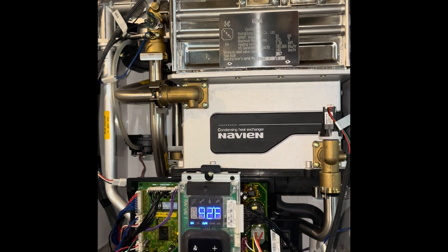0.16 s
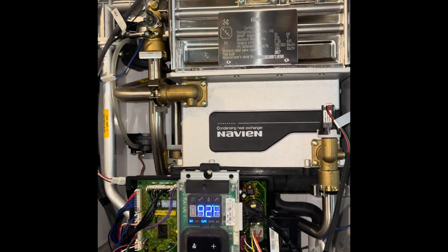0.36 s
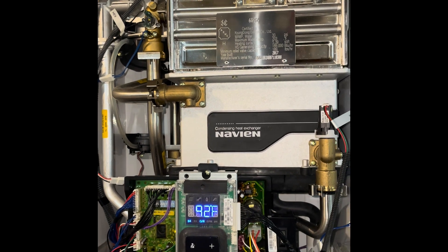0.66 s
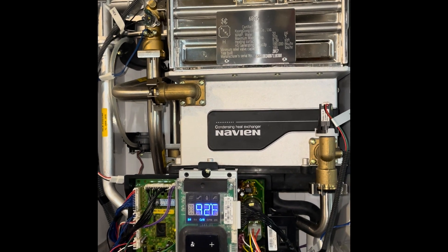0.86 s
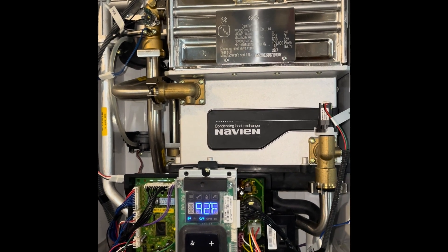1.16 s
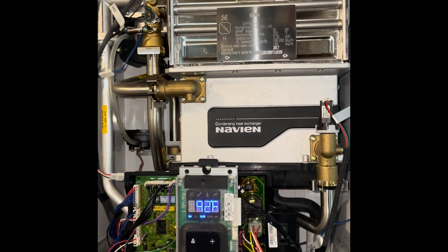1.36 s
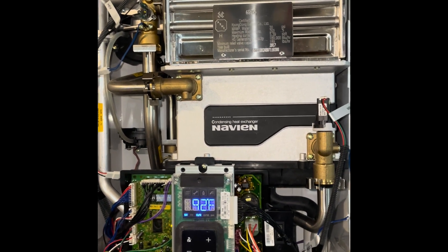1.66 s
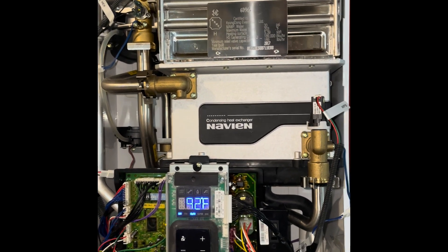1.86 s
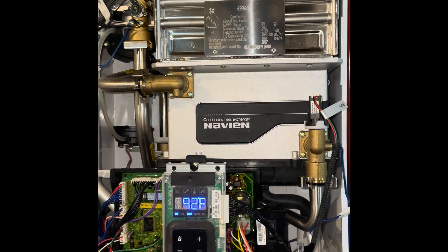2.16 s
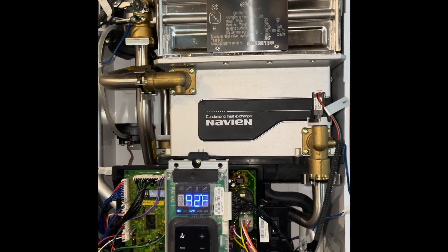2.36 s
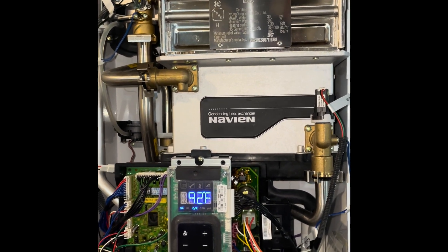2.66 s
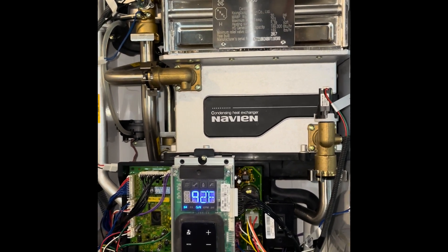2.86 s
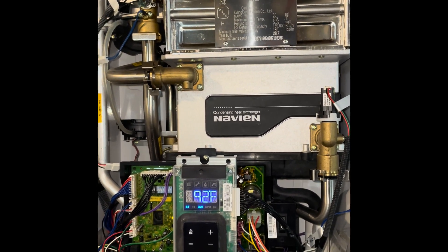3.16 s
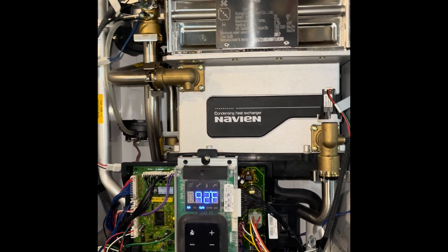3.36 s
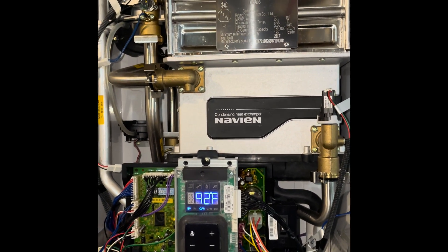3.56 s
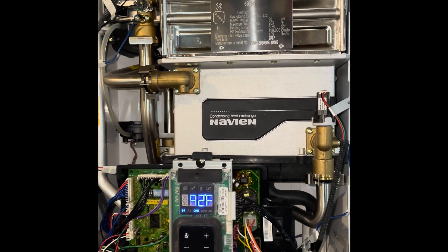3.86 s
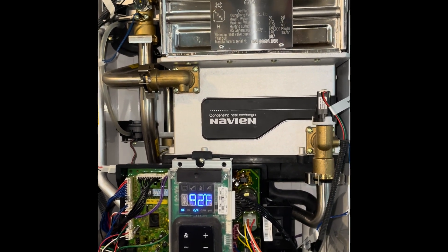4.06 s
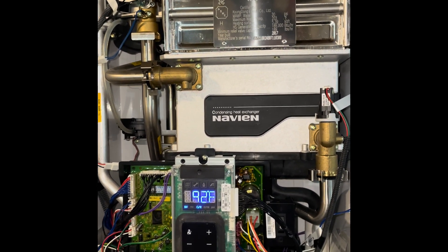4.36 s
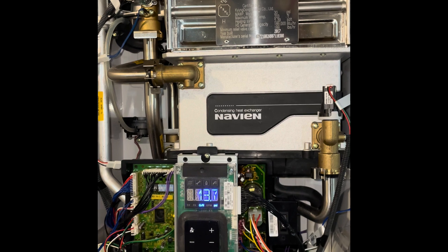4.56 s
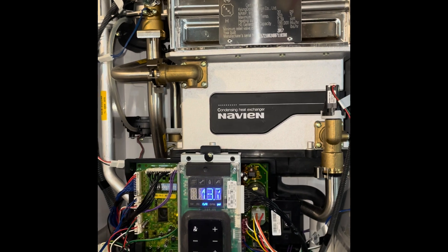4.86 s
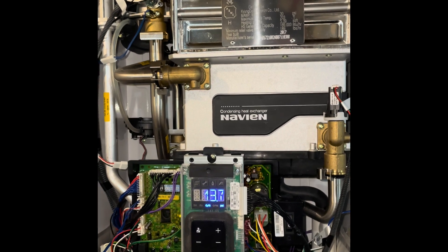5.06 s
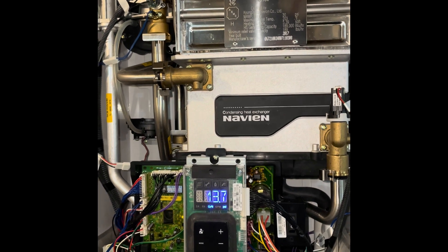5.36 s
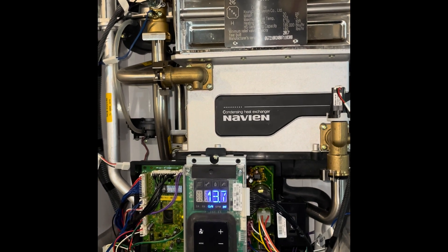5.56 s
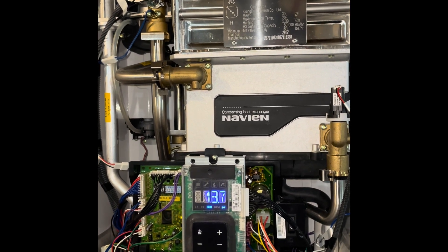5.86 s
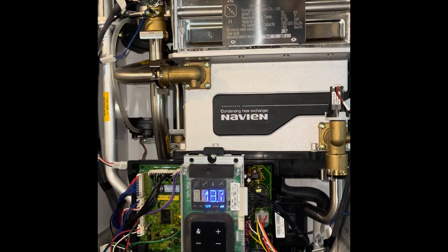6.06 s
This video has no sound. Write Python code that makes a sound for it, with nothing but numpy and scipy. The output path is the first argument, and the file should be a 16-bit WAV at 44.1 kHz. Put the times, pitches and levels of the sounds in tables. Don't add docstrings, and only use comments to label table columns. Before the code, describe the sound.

From 0 s a boiler blower is already at full speed, close to a stereo phone indoors. A hollow low boom around 200 Hz dominates, wavering in short gusts and lulls, including a marked dip near 2.15 s, beneath a broad duct and panel rush. A shaft hum near 97 Hz and a steady whine near 1.26 kHz with a flickering octave cut through, plus faint higher motor lines. A very thin whistling hiss around 11.5 kHz chirps irregularly, holding at about 0.9-1.2 s and more softly at 3.9-4.3 s. Speed barely drifts until 5.8 s, when power drops: blade tones weaken and slide downward, motor whine briefly strengthens then fades, and the roar begins easing. A small relay tick comes at 5.9 s, followed by bright metallic valve clicks at 5.92 and 5.98 s. The sound ends while still coasting.

```python
import sys
import numpy as np
from scipy import signal
from scipy.fft import rfft, irfft, next_fast_len
from scipy.io import wavfile
from scipy.ndimage import uniform_filter1d

SR = 44100
rng = np.random.default_rng(int(sys.argv[2]) if len(sys.argv) > 2 else 0)


def volts_from_db(level):
    exponent = np.asarray(level, float) / 20
    return 10 ** exponent


def dump(signal):
    limited = np.clip(np.atleast_2d(signal).T, -1, 1)
    pcm = np.round(limited * 32767).astype(np.int16)
    wavfile.write(sys.argv[1], SR, pcm)


N = 273861
TIME = np.arange(N) / SR
SIZE = next_fast_len(N)
HZ = np.arange(SIZE // 2 + 1) * SR / SIZE + 1e-3

# time_s, blade_rate_hz
BLADE_RATE = [(0.15, 1256.0), (0.5, 1258.1), (0.9, 1261.7), (1.4, 1261.2), (2, 1261.2), (2.5, 1259.8),
              (3, 1257.5), (3.4, 1257.4), (3.8, 1257.1), (4.3, 1257.2), (4.8, 1258.8), (5.3, 1258.9),
              (5.65, 1259.0)]
BLADES = 13
POWER_OFF_S, COAST_PER_S = 5.82, .335

WHEEL_ORDERS = [
    1,
    13,
    26,
]
# level_db, left_minus_right_db, flicker_db
WHEEL_LINES = [(-47, -.2, 1.2), (-48, -4, .7), (-51.5, .5, 3.4)]
MOTOR_ORDERS = [32, 39, 40, 48, 55, 56, 57, 64, 80]
# level_db, left_minus_right_db, flicker_db
MOTOR_LINES = [(-67, -3, 2.5), (-68, 0, 2.5), (-59.5, 1.5, 2.2), (-73, 0, 2.5), (-69.5, 0, 3.5),
               (-66, 0, 3.5), (-72, 0, 3.5), (-71, 0, 2.5), (-68, 0, 3.5)]
MOTOR_HOLD_S, MOTOR_FADE_S = .1, .1

# freq_hz, left_lead_rad, left_minus_right_db, common_share (0-1)
PORTS = [(60, 0, -.1, .9995), (250, -.07, -1.1, .999), (600, -.1, -1.6, .96), (950, 0, -1.5, .93),
         (1700, .03, -.3, .98), (2300, .62, .8, .94), (3000, .4, -1.5, .73), (4300, .95, -1, .76),
         (5100, .05, 0, .91), (6400, 1.97, 0, .94), (7600, 3.14, 0, .92), (9200, 4.5, 0, .76),
         (10900, 6.28, 0, .82), (15700, 10.7, 0, .72)]

# freq_hz, density_db_per_hz
AIR = [(25, -101), (42, -71), (55, -66), (130, -66), (350, -73), (620, -80), (1400, -82.5), (2100, -77.5),
       (3600, -85.5), (5200, -91), (8200, -91), (10500, -90.5), (12200, -97), (15700, -101)]
# freq_hz, width_hz, density_db_per_hz
DUCTS = [(56, 12, -65.0), (176, 14, -53.0), (209, 28, -45.0), (237, 24, -53.5), (297, 42, -57.0),
         (415, 36, -60.5), (485, 31, -57.0), (548, 38, -61.5), (631, 30, -71.0), (793, 96, -66.0),
         (960, 116, -71.5), (1048, 59, -65.0), (1079, 22, -65.5), (1246, 402, -74.0), (1449, 41, -68.5),
         (1612, 86, -74.5), (1802, 121, -63.5), (1951, 55, -77.5), (2485, 75, -65.0), (2616, 36, -72.5),
         (2788, 67, -72.0), (3270, 197, -79.5), (3837, 166, -86.5), (4382, 62, -84.5), (4890, 90, -80.0),
         (5971, 851, -83.5), (6477, 86, -79.0), (6747, 170, -80.5), (7246, 73, -84.5), (7649, 498, -87.5)]
# freq_hz, width_hz, depth_db
GAPS = [(394, 12, -2.0), (618, 16, -5.0), (703, 14, -3.5), (954, 11, -4.5), (1142, 41, -4.5),
        (1395, 13, -7.5), (1887, 65, -6.0), (2055, 68, -6.5), (2572, 39, -4.5), (3549, 88, -3.0),
        (6324, 76, -2.5), (7505, 24, -7.0), (12893, 142, -10.0)]
RIPPLE_DB, RIPPLE_HZ = 1.3, 35
ROAR_POWER = 2.5
BOOM_TOP_HZ, BOOM_DB, BOOM_DEPTH = 265, -29.5, 1.09
# center_s, change_db, length_s
GUSTS = [(0.01, -2.5, 0.033), (0.162, 6, 0.044), (0.385, 4.0, 0.15), (0.53, -2.5, 0.05), (1.45, 4.5, 0.05),
         (1.55, -2.5, 0.076), (1.7, 4.0, 0.1), (1.8, -3, 0.054), (1.91, 2.5, 0.07), (2.05, 3, 0.05),
         (2.153, -8.0, 0.094), (2.58, -4.5, 0.045), (2.688, 4.5, 0.07), (2.787, -3.5, 0.078),
         (2.92, 5, 0.05), (3.02, -5, 0.11), (3.277, 4.0, 0.13), (3.518, -3.0, 0.044), (3.675, 3.0, 0.14),
         (4.15, -4.0, 0.05), (4.484, 2.5, 0.14), (5.24, 3.5, 0.05), (5.41, -3.5, 0.1), (5.58, 5, 0.058),
         (5.92, 2.5, 0.05), (6.03, -0.5, 0.07)]

JET_HZ, JET_WIDTH_HZ, JET_REST_DB = 11560, 240, -65
JET_POWER = 6.0
# center_s, rise_db
CHIRPS = [(0.08, 3), (0.26, 5), (0.56, 6), (1.43, 4), (1.83, 5), (2.29, 6), (2.56, 4), (2.82, 6),
          (3.259, 6), (3.36, 7), (3.58, 4), (4.35, 7), (4.55, 4), (5.24, 6), (5.35, 5), (5.81, 6)]
CHIRP_S = .05
# start_s, length_s, rise_db
WHISTLES = [
    (0.88, .35, 7.5),
    (3.89, .42, 5.5),
]
WHISTLE_EDGE_S = .03

# start_s, peak_db
TICK = [
    (5.8964, -34),
]
# freq_hz, width_hz, level_db
RELAY_BODY = [(2900, 1500, 0)]
# start_s, peak_db
CLICKS = [
    (5.9189, -35.5),
    (5.9808, -36),
]
# freq_hz, width_hz, level_db
VALVE_BODY = [(5200, 900, -6), (7560, 1200, 3), (9600, 2500, -4), (13000, 3000, -15)]
RELAY_T60_S, VALVE_T60_S = .025, .076

LOW_CUT_HZ = 35


def curve(table):
    return np.interp(TIME, *np.transpose(table))


def speed():
    driven_hz = curve(BLADE_RATE) / BLADES
    coast_s = np.maximum(TIME - POWER_OFF_S, 0)
    return driven_hz * (1 - COAST_PER_S * coast_s)


def port(hz, column):
    table = np.array(PORTS)
    return np.interp(hz, table[:, 0], table[:, column])


def walk(rate_hz):
    k = int(SR / rate_hz)
    drift = uniform_filter1d(uniform_filter1d(rng.standard_normal(N), k), k)
    return drift / np.std(drift)


def lines(orders, rows, shaft_hz):
    turn_rad = 2 * np.pi * np.cumsum(shaft_hz) / SR
    side = np.array([[.5], [-.5]])
    tones = []
    for order, (level_db, pan_db, flicker_db) in zip(orders, rows):
        lag_rad = side * port(order * shaft_hz, column=1)
        angle_rad = order * turn_rad + rng.uniform(0, 2 * np.pi) + lag_rad
        swing_db = flicker_db * (0.66 * walk(11.5) + 0.54 * walk(1.4))
        tones.append(np.sqrt(2) * volts_from_db(level_db + side * pan_db + swing_db) * np.sin(angle_rad))
    return np.array(tones)


def rings(modes):
    return sum(volts_from_db(db) ** 2 / (1 + ((HZ - hz) / (.78 * width)) ** 2) ** 2 for hz, width, db in modes)


def rush(power):
    common, left, right = rfft(rng.standard_normal((3, SIZE))) * np.sqrt(power * SR / 2)
    share = np.clip(port(HZ, column=3), 0, 1)
    half_lag = np.exp(.5j * port(HZ, column=1))
    half_pan = volts_from_db(port(HZ, column=2) / 2)
    shared = np.sqrt(share) * common
    diffuse = np.sqrt(1 - share)
    left = (shared * half_lag + diffuse * left) * half_pan
    right = (shared / half_lag + diffuse * right) / half_pan
    return irfft(np.array([left, right]), SIZE)[:, :N]


def steady(x, over_s):
    k = int(over_s * SR)
    power = np.mean(x ** 2, axis=0)
    return x / np.sqrt(uniform_filter1d(uniform_filter1d(power, k), k))


def ripple():
    k = int(RIPPLE_HZ / HZ[1])
    uneven = uniform_filter1d(uniform_filter1d(rng.standard_normal(len(HZ)), k), k)
    return volts_from_db(RIPPLE_DB * uneven / np.std(uneven) * np.clip(HZ / 3000, 0, 1)) ** 2


def swells(times_s, rises_db, lengths_s):
    t = TIME[::100]
    events = np.broadcast(times_s, rises_db, lengths_s)
    bells_db = sum(db * 2 ** -(2 * (t - s) / length) ** 2 for s, db, length in events)
    return np.interp(TIME, t, bells_db)


def roar(shaft_hz):
    air_hz, air_db = np.transpose(AIR)
    air = volts_from_db(np.interp(np.log(HZ), np.log(air_hz), air_db)) ** 2
    gaps_db = sum(db / (1 + (2 * (HZ - hz) / width) ** 2) for hz, width, db in GAPS)
    duct_modes = [m for m in DUCTS if m[0] >= BOOM_TOP_HZ]
    boom_modes = [m for m in DUCTS if 100 < m[0] < BOOM_TOP_HZ]
    ducts = rush(ripple() * volts_from_db(gaps_db) ** 2 * (air + rings(duct_modes)))
    boom = steady(rush(rings(boom_modes)), over_s=0.068)
    rumble = rush(rings(DUCTS[:1]))
    gusts_db = BOOM_DEPTH * swells(*np.transpose(GUSTS))
    flow = (shaft_hz / shaft_hz[0]) ** ROAR_POWER
    return (ducts * volts_from_db(0.33 * walk(5.3)) + rumble + boom * volts_from_db(BOOM_DB + gusts_db)) * flow


def jet(shaft_hz):
    hiss = steady(rush(rings([(JET_HZ, JET_WIDTH_HZ, 0)])), over_s=.05)
    held_db = 0
    for start_s, length_s, rise_db in WHISTLES:
        inside_s = np.minimum(TIME - start_s, start_s + length_s - TIME)
        held_db = held_db + rise_db * np.clip(inside_s / WHISTLE_EDGE_S, 0, 1)
    chirps_db = swells(*np.transpose(CHIRPS), CHIRP_S)
    level_db = JET_REST_DB + held_db + chirps_db + 1.6 * walk(25)
    return hiss * volts_from_db(level_db) * (shaft_hz / shaft_hz[0]) ** JET_POWER


def knocks(events, body, t60_s):
    rattle = rush(rings(body))
    table = np.array(events)
    since_s = TIME - table[:, :1]
    shape = volts_from_db(table[:, 1:] - 60 * np.maximum(since_s, 0) / t60_s) * (since_s >= 0)
    return rattle / np.std(rattle) * shape.sum(axis=0)


def valve():
    relay = knocks(TICK, RELAY_BODY, RELAY_T60_S) * volts_from_db(-7)
    return relay + knocks(CLICKS, VALVE_BODY, VALVE_T60_S) * volts_from_db(-1.5)


def scene():
    shaft_hz = speed()
    off_s = np.maximum(TIME - POWER_OFF_S, 0)
    unpowered = 1 - np.exp(-off_s / MOTOR_FADE_S)
    braking = np.exp(-2 * np.maximum(TIME - POWER_OFF_S - MOTOR_HOLD_S, 0) / MOTOR_FADE_S)
    shake, blade, overtone = lines(WHEEL_ORDERS, WHEEL_LINES, shaft_hz)
    overtone = overtone * volts_from_db(np.clip(16.0 * (np.median(shaft_hz) - shaft_hz), -2.5, 2.5))
    wheel = shake * volts_from_db(3 * unpowered) + blade * volts_from_db(-13 * unpowered) + overtone * volts_from_db(-6 * unpowered)
    motor = lines(MOTOR_ORDERS, MOTOR_LINES, shaft_hz).sum(axis=0) * braking * volts_from_db(7 * unpowered)
    return wheel + motor + roar(shaft_hz) + jet(shaft_hz) + valve()


def roll_off(x):
    return signal.sosfilt(signal.butter(12, 15720, fs=SR, output="sos"), x)


def record(dry):
    low_cut = signal.butter(4, LOW_CUT_HZ, "high", fs=SR, output="sos")
    mix = signal.sosfilt(low_cut, dry)
    return roll_off(mix)


dry = scene()
out = record(dry)
dump(out)
```